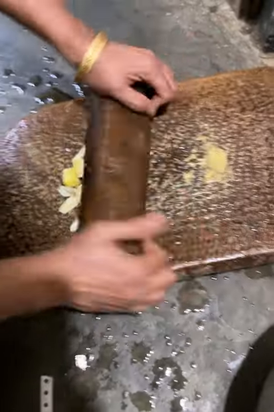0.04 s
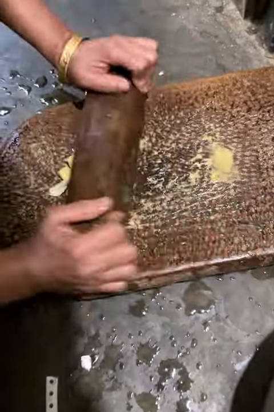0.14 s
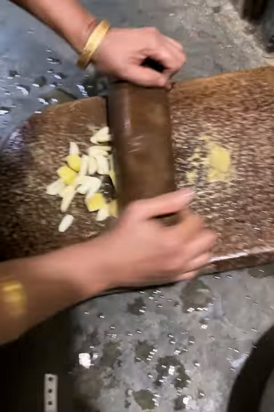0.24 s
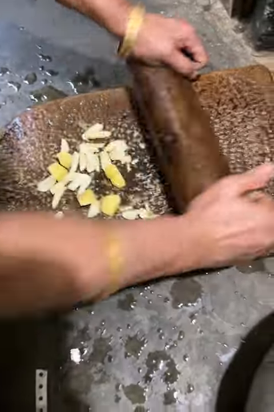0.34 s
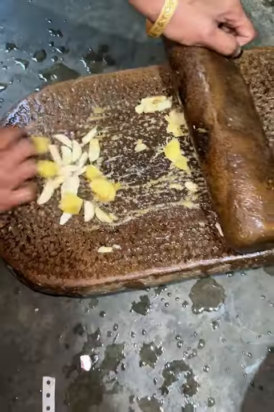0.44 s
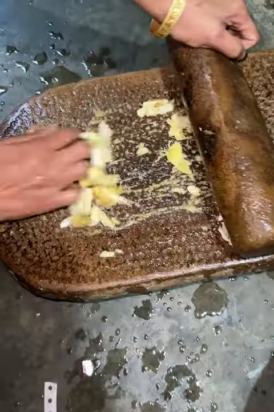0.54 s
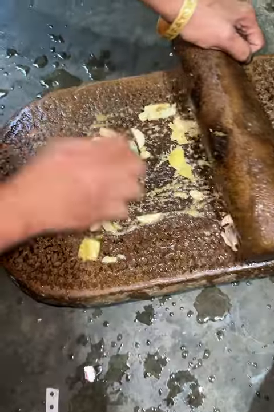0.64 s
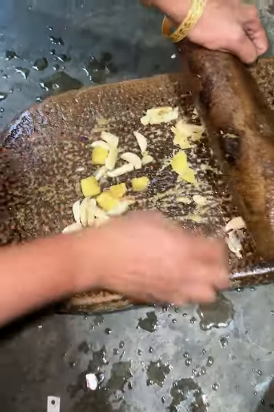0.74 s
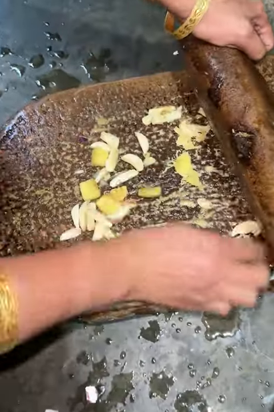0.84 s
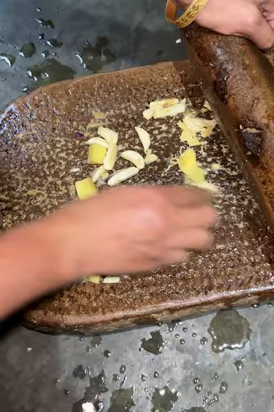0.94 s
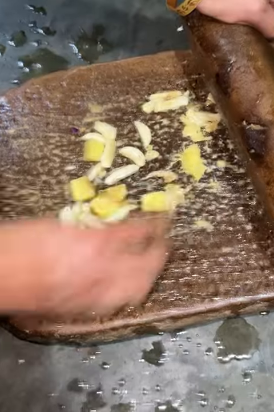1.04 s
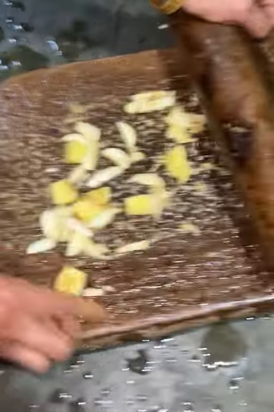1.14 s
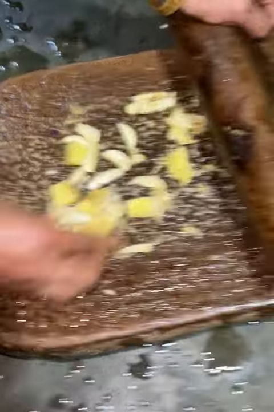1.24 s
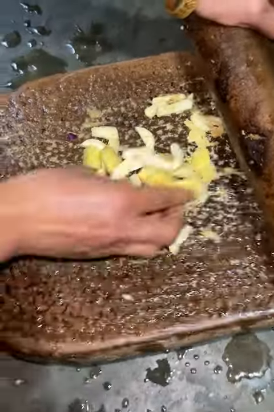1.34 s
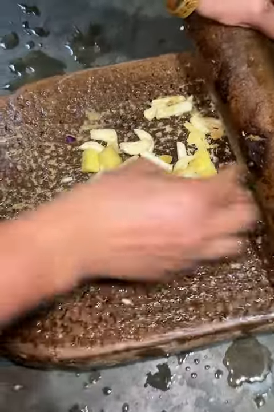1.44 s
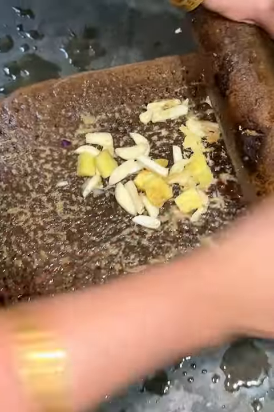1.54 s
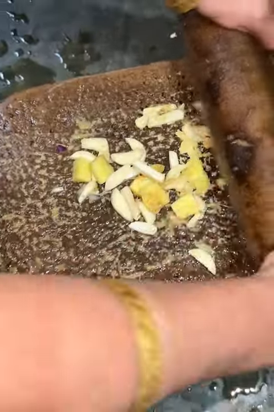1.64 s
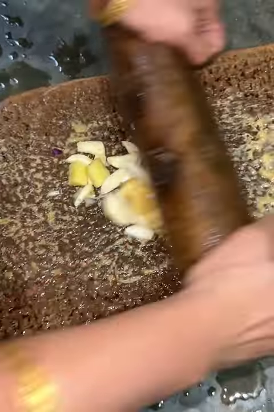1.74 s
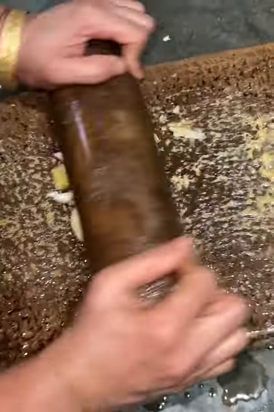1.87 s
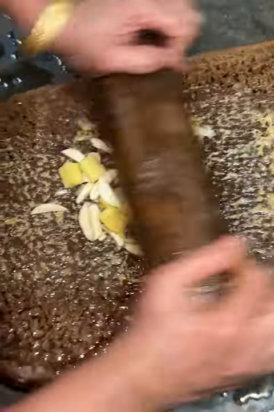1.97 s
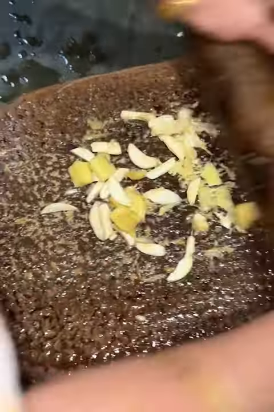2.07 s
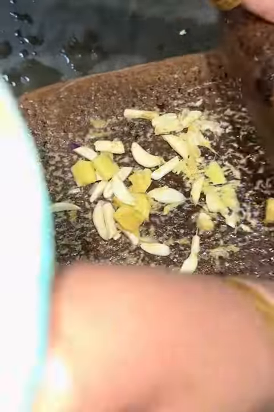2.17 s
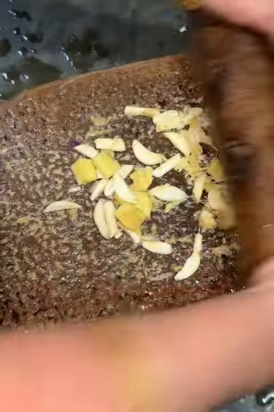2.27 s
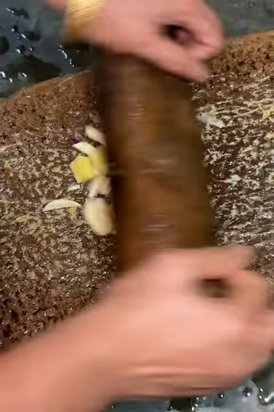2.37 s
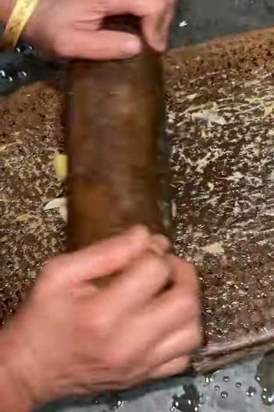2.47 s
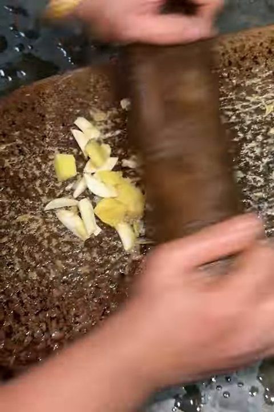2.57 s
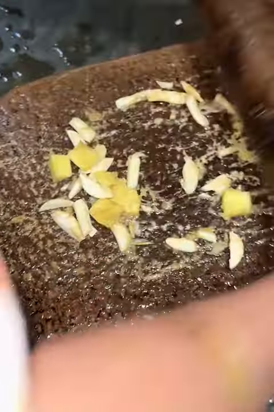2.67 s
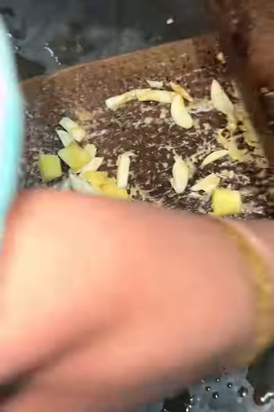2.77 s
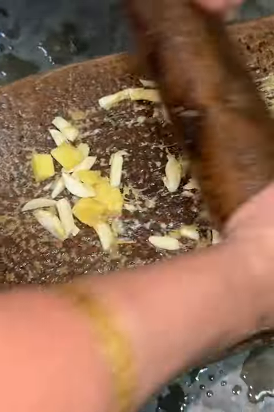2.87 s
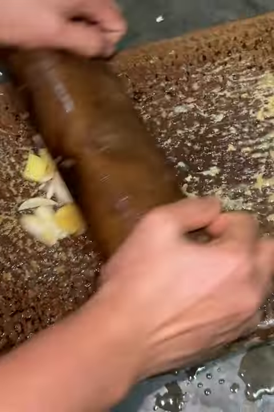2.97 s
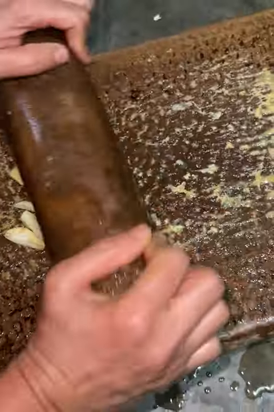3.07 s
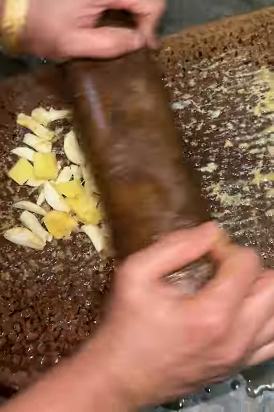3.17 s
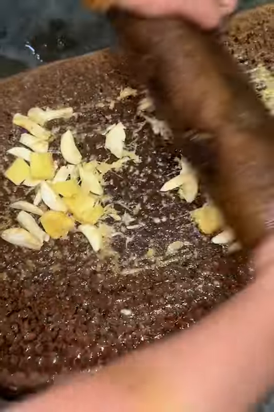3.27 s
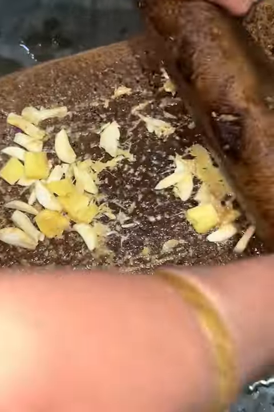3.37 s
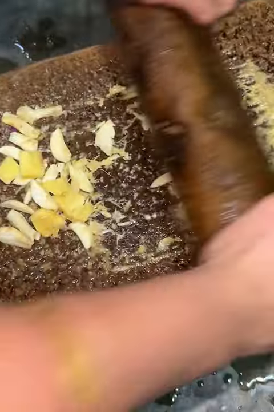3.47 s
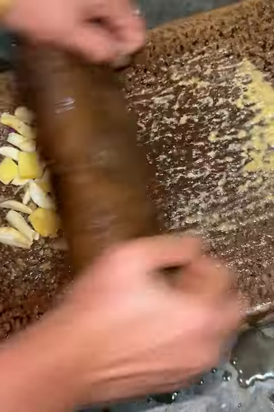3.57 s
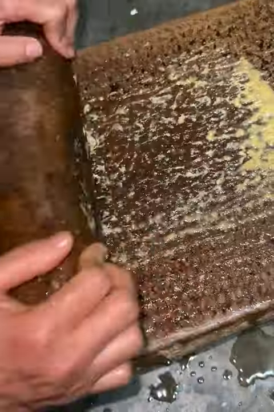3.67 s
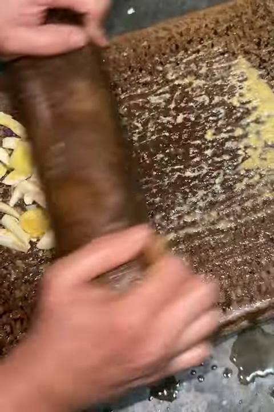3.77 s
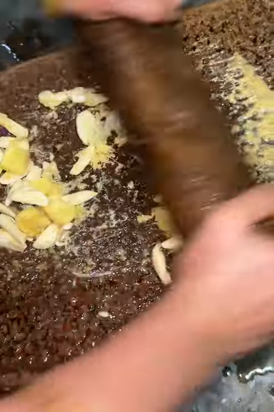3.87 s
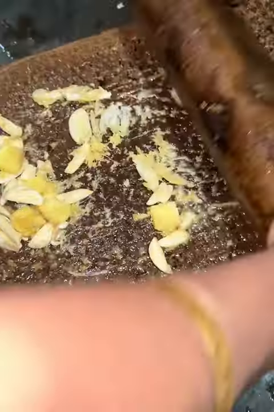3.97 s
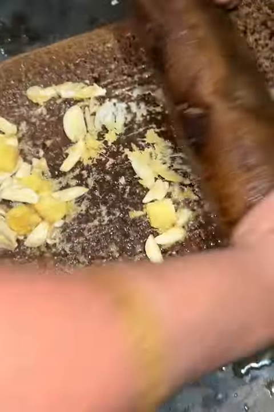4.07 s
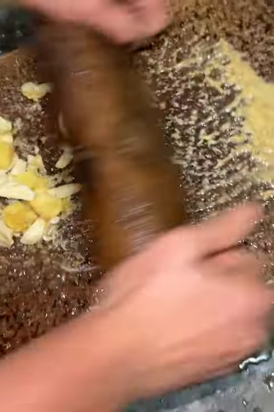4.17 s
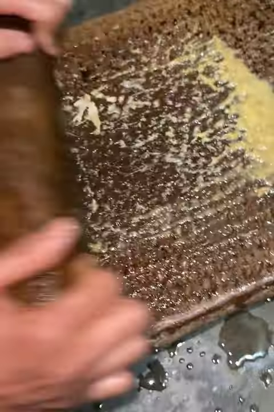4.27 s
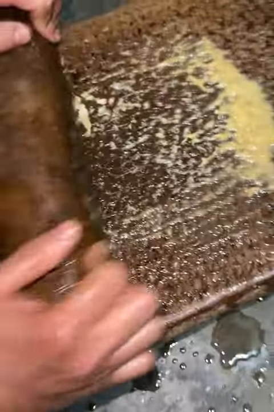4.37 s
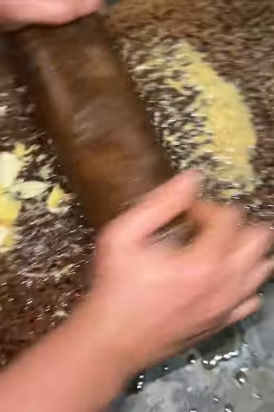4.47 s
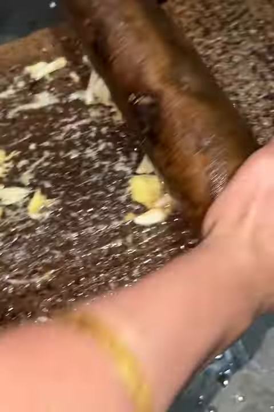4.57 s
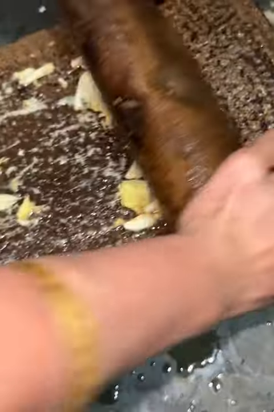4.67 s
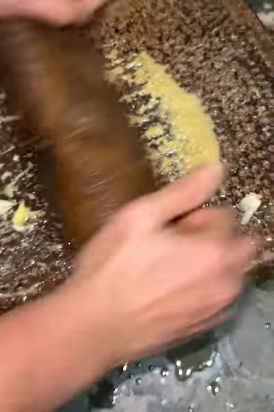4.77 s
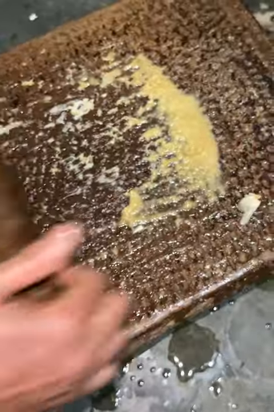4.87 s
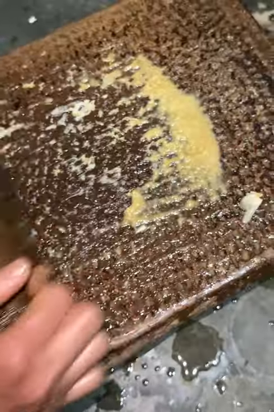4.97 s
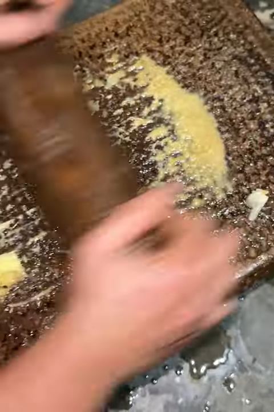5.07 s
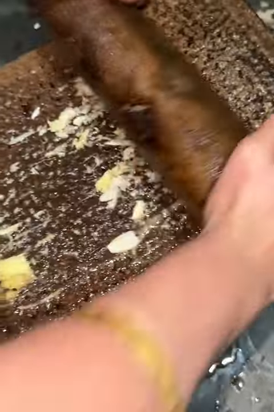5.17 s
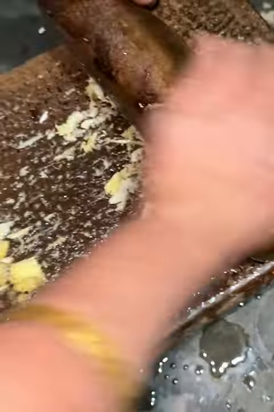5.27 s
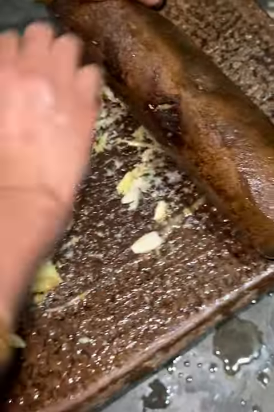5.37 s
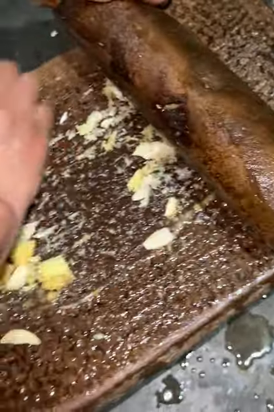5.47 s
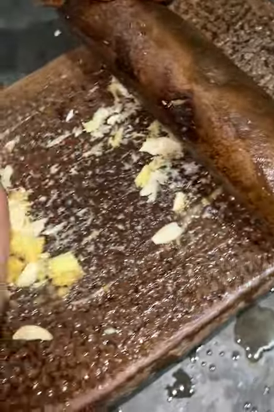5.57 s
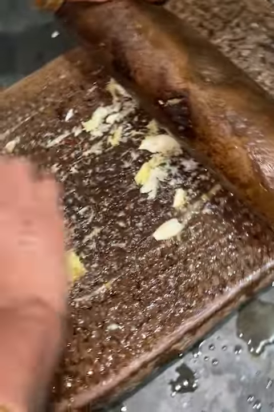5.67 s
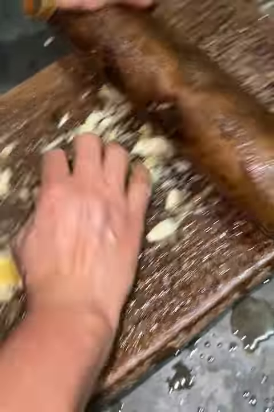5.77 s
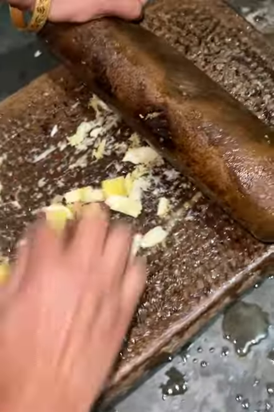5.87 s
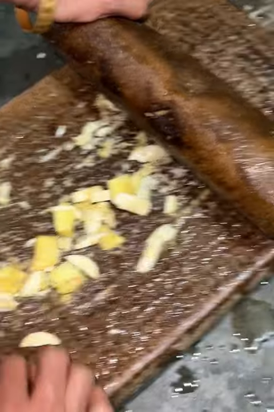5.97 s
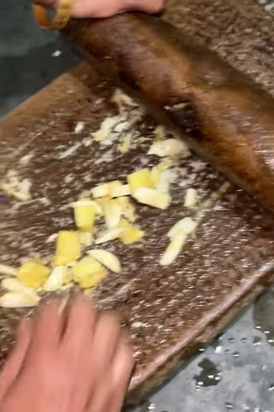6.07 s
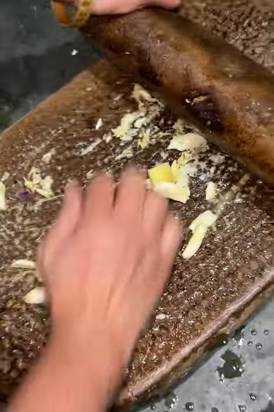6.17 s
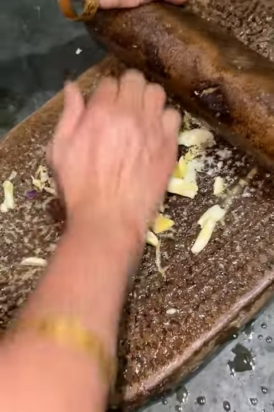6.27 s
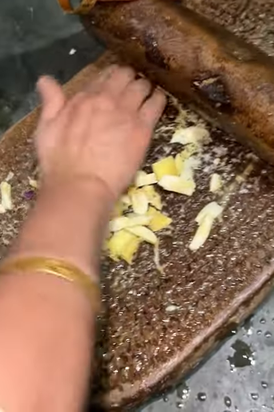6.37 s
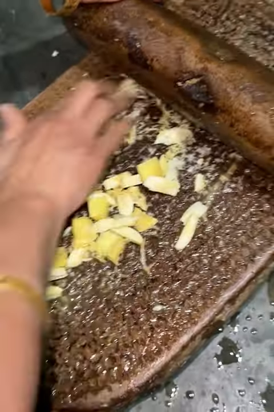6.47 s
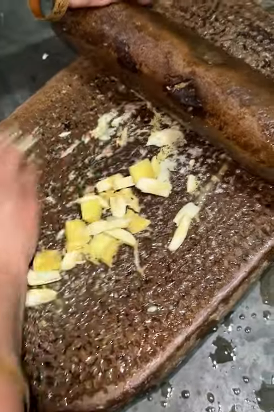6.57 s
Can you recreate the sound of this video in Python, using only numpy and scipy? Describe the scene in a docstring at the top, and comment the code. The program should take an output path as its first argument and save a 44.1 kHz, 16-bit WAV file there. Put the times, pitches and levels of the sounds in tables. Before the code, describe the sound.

A heavy stone roller knocks and scrapes across a pitted stone slab in quick gritty bursts, crushing wet food in a hard-walled kitchen.

```python
"""Stone knocks on stone: a roller strikes a pitted slab and is dragged over wet food, close to the microphone.
Each knock rings slab, roller and floor, and a hard kitchen echoes it; each stroke hisses, rumbles and drones.
A bangle clinks once as a set of beating metal modes; behind lie a faint trickle of filtered noise, room tone,
and gurgles and rustles made of clustered small tones. Early on the sound drops out once and fades back in."""
import sys
import numpy as np
from scipy import signal
from scipy.fft import rfft, irfft, next_fast_len
from scipy.io import wavfile
from scipy.ndimage import uniform_filter1d

SR = 44100
rng = np.random.default_rng(int(sys.argv[2]) if len(sys.argv) > 2 else 0)


def generate_wav(signal):
    """Clip the signal to [-1, 1] and save it as 16-bit WAV at the path in sys.argv[1]."""
    frames = np.transpose(np.atleast_2d(signal))
    scaled = np.clip(frames, -1, 1) * 32767
    pcm = np.round(scaled).astype(np.int16)
    wavfile.write(sys.argv[1], SR, pcm)


N = 291942

# Blows of the roller on the slab. Each row: start in seconds, slab level in dB, floor thump level in dB,
# roller level in dB, slab brightness in dB per octave.
BLOWS = [(0.096, -31, -27, -56, -11.5), (0.226, -7.5, -29.5, -14.5, 2.3), (0.253, -30, -37, -26, 7),
         (0.278, -20, -43, -25, 7), (0.309, -19, -35, -26, 0), (0.344, -28.5, -44, -47, -4),
         (0.939, -39, -31.5, -42, -3), (1.628, -21, -27, -36, -10), (1.653, -13.5, -40, -23.5, 5),
         (1.7, -21.5, -27, -29, -5), (1.736, -13.5, -28, -18, -1), (1.757, -31, -29, -21.5, 3),
         (1.854, -29.5, -50, -31, -1), (2.017, -5, -18, 0.5, -0.5), (2.045, -1.5, -13.5, -36, 2.5),
         (2.252, -19, -26.5, -26.5, -3), (2.517, 3.5, -22, -20.5, 4), (2.531, -5.5, -36, -40, -2),
         (2.554, -9, -15.5, -23, 5), (2.649, -9, -30, 3.5, -0.5), (2.681, -2.5, -25, -36, 2),
         (2.708, -15, -17.5, -34, -1.5), (2.87, -20, -23, -42, -4.5), (2.885, -17.5, -26, -30, 10),
         (2.918, -6.5, -22.5, -19, 7.5), (2.94, -3, -42, -9, -0.5), (2.959, -15, -28, -18, 6),
         (2.972, -12.5, -35, -28, 0.1), (3.032, -9, -43, -14.5, 7), (3.055, -16.5, -43.5, -40, -1),
         (3.113, -3, -15.5, -29.5, -1), (3.238, -1.5, -33, -12, 8.5), (3.259, -18, -38, -35, -3),
         (3.276, 0, -44, -4.5, 2.5), (3.299, -33, -20, -31, -4), (3.46, -23, -45, -22, -3),
         (3.731, 3.5, -12, -29, 3), (3.756, -12, -32, -22, 6), (3.859, 1, -24.5, -3.5, 7),
         (3.889, -12, -28.5, -17, 9), (4.186, -15.5, -31, -14.5, 1.5), (4.209, -17.5, -56, -15, 2),
         (4.353, 3, -12, -24, 3), (4.376, -8.5, -22, -21, 2.5), (4.544, -8, -36, 2, -2),
         (4.556, -8, -24, -35, 1.5), (4.583, -12, -23.5, -32, 0.1), (4.982, -14, -27, -49, -8),
         (5.009, -45, -25.5, -51, -2), (5.16, -21.5, -30.5, -32, -4.5), (5.21, -29.5, -49, -57, 2)]
# Modes of the floor, the stone slab and the stone roller.
# Each row: frequency in Hz, level in dB, time to fall 60 dB in seconds.
FLOOR_MODES = [(101.9, -3.5, 0.26), (120.5, 2, 0.27)]
SLAB_MODES = [(240, -8, 0.099), (276.7, -8, 0.13), (343.2, -1.5, 0.058), (505.8, 2, 0.06),
              (596.4, -3.5, 0.069), (645, -1.5, 0.061), (697.6, -4.5, 0.052), (863, -4.5, 0.024)]
ROLLER_MODES = [(1080, -8, .018), (1410, 3, .028), (1700, -3, .017), (2140, -3, .013), (2700, -9, .009),
                (3600, -18, .006)]
# The one dropout: start in seconds, fade-in in seconds.
DROPOUT = (.3945, .035)


def amp(db):
    """Amplitude of a level in dB."""
    return 10 ** (np.asarray(db) / 20)


def unit(x):
    """x scaled to an RMS of 1."""
    return x / np.sqrt(np.mean(x ** 2) + 1e-20)


def along(points, hz):
    """Curve through (Hz, value) points, straight on a log frequency axis."""
    f, v = np.transpose(points)
    return np.interp(np.log(hz + 1), np.log(f + 1), v)


def filtered(x, response):
    """x passed through a complex response of frequency."""
    m = next_fast_len(N + SR // 2)
    return irfft(rfft(x, m) * response(np.fft.rfftfreq(m, 1 / SR)), m)[..., :N]


def patchy(patchy_db, wide, long):
    """Two unrelated white noises sharing patches of random gain, wide in bins and long in frames."""
    z = signal.stft(rng.standard_normal((2, N)), nperseg=256)[2]
    field = uniform_filter1d(rng.standard_normal(z.shape[1:]), wide, 0)
    field = uniform_filter1d(field, long, 1)
    return signal.istft(z * amp(patchy_db * unit(field)), nperseg=256)[1][:, :N]


def resonant(modes, blur):
    """Response of a body as a sum of resonances of alternating sign; blur widens them."""
    def response(f):
        total = 0
        for k, (hz, db, t60) in enumerate(modes):
            width = blur * np.log(1000) / (np.pi * t60)
            total = total + (-1) ** k * amp(db) * 1j * f * width / (hz * hz - f * f + 1j * f * width)
        return total
    return response


def struck(modes, t, cycles, tilt_db):
    """One blow, peak 1: each mode swells over a few of its own cycles, so the low ones arrive last.
    tilt_db (per octave) dulls a soft contact; neighbouring high modes start in opposite directions."""
    ring = 0
    for k, (hz, db, t60) in enumerate(modes):
        size, detune = rng.standard_normal(2)
        sign = np.cos(np.pi * k * (hz > 1e3))
        level = amp(db + tilt_db * np.log2(hz / 1e3) + 2.2 * size - 60 * t / t60)
        swell = (1 - np.exp(-t * hz / cycles)) ** 2
        ring = ring + sign * level * swell * np.sin(2 * np.pi * hz * (1 + .015 * detune) * t)
    return ring / np.abs(ring).max()


def kitchen_echo(x):
    """Reverberation through a fresh pair of noise tails; each frequency dies at its own speed."""
    # Each row: frequency in Hz, time to fall 60 dB in seconds.
    echo_decay = [(150, 0.8), (500, 0.23), (1500, 0.28), (4000, 0.16)]
    hz, t, z = signal.stft(rng.standard_normal((2, SR // 2)), SR, nperseg=256)
    fade = amp(-60 * t / along(echo_decay, hz)[:, None])
    tail = signal.istft(z * fade, SR, nperseg=256)[1]
    delayed = np.pad(x, (500, 0))[None]  # samples of silence before the echo
    return signal.fftconvolve(delayed, tail / np.linalg.norm(tail[0]), axes=1)


def knocks():
    """Slab, roller and floor ring together with a noisy crack; the hard walls answer each blow."""
    out, t = np.zeros((2, N + 2 * SR)), np.arange(SR // 2) / SR
    brief = t[:SR // 8]
    last = 0
    for s, slab_db, thump_db, roller_db, bright_db in BLOWS:
        soft = np.clip((slab_db - roller_db) / 20, 0, 1)  # food under the roller cushions the contact
        slab = amp(slab_db) * struck(SLAB_MODES, brief, cycles=0.64, tilt_db=bright_db)
        roller = amp(roller_db) * struck(ROLLER_MODES, brief, cycles=.5, tilt_db=2 - 9 * soft)
        thump = amp(thump_db) * struck(FLOOR_MODES, t, cycles=1.0, tilt_db=-9)
        crack = amp(roller_db - 14.5 - 60 * brief / .006) * rng.standard_normal(len(brief))
        echo = kitchen_echo(amp(-7.5) * slab + amp(-17.5) * roller)
        if s > DROPOUT[0] > last:
            out[:, round(DROPOUT[0] * SR):] = 0  # tails of the earlier blows end at the dropout
        last = s
        at = round(s * SR)
        out[0, at:at + len(t)] += thump
        out[0, at:at + len(brief)] += slab + roller + crack
        out[:, at:at + echo.shape[1]] += echo
    return out[:, :N]


def rattle():
    """Chatter of the roller that dies away after each blow, in proportion to the roller's level."""
    under_blow_db, decay_db_per_s = -25.5, 142
    blows = np.zeros(N)
    for s, slab_db, thump_db, roller_db, bright_db in BLOWS:
        blows[round(s * SR)] = amp(roller_db + under_blow_db)
    decay = amp(-decay_db_per_s * np.arange(SR // 2) / SR)
    return signal.fftconvolve(blows, decay)[:N].clip(0)


def pressure(release_db_per_s, order):
    """Rise, hold and release of every stroke, summed in power with the fingers' level.
    order picks the level: 0 hiss, 1 rumble, 2 drone."""
    # Strokes of the roller. Each row: moment of full pressure in seconds, rise in seconds, hold in seconds,
    # grit hiss level in dB, slab rumble level in dB, floor drone level in dB.
    roller_strokes = [(0.0, .01, .14, -42.5, -50, -40), (0.229, 0.099, 0.025, -30, -42, -48),
                      (1.255, 0.068, 0.009, -44, -58, -60), (1.675, 0.018, .005, -37, -46, -42),
                      (1.753, 0.059, 0.023, -33.5, -65, -51), (1.882, .04, 0.0106, -41, -72, -51),
                      (2.015, 0.098, 0.027, -22, -56, -36), (2.333, 0.11, 0.1, -34, -52.5, -40),
                      (2.506, 0.035, 0.15, -32, -40, -41), (2.912, 0.13, 0.057, -34.5, -31, -29),
                      (3.108, 0.073, 0.13, -30, -50, -35), (3.495, 0.055, 0.2, -38, -65.5, -45.5),
                      (3.729, .03, 0.15, -30.5, -33, -40), (3.996, 0.011, .005, -35, -41, -51),
                      (4.186, 0.12, 0.042, -32.5, -45, -39), (4.304, 0.014, .005, -38, -66, -47),
                      (4.351, 0.03, 0.17, -29.5, -38, -28), (4.775, 0.073, 0.12, -34.5, -55, -36.5),
                      (4.99, 0.048, .15, -31.5, -49, -32), (5.343, 0.018, .005, -45.5, -69, -55)]
    # Fingers gathering the food between strokes. Each row: time in seconds, grit hiss level in dB,
    # slab rumble level in dB, floor drone level in dB.
    fingers = [(0, -46, -59, -46), (.5, -44.5, -52.5, -54), (1, -46.5, -52.5, -46),
               (1.6, -44.5, -55, -49.5), (2.2, -51.5, -49.5, -41.5), (3.4, -45.5, -46.5, -48.5),
               (4.7, -49, -52, -45), (5.4, -54, -51.5, -60.5), (5.9, -56, -60.5, -54.5),
               (6.07, -45.5, -50.5, -50), (6.25, -52.5, -55, -52), (6.62, -45, -57, -54)]
    rise_db, sag_db_per_s = 21, 14  # climb during the rise, slackening in the hold
    t = np.arange(0, N + 32, 32) / SR
    power = amp(np.interp(t, *np.transpose(fingers)[[0, 1 + order]])) ** 2
    for s, rise, hold, *levels in roller_strokes:
        since = t - s
        climb = rise_db * np.minimum(since, 0) / (rise + 1 / SR)
        sag = sag_db_per_s * np.clip(since, 0, hold)
        release = release_db_per_s * np.maximum(since - hold, 0)
        power += amp(levels[order] + climb - sag - release) ** 2
    return np.interp(np.arange(N) / SR, t, np.sqrt(power))


def strokes():
    """Grit on the pitted face: dense grains hiss, coarser bumps shake slab and floor, chatter grates."""
    # Spectrum of the grit. Each row: frequency in Hz, relative level in dB per Hz.
    grit = [(700, -4), (1600, -4), (3000, 1), (5500, 0.5), (7900, 2.5), (9500, -1), (10800, 0.5),
            (12500, -5), (15900, -5)]
    hiss_release, heavy_release = 217, 102  # dB per s; rumble and drone die more slowly than the hiss
    impacts = (rng.random(N) < .008) * rng.exponential(9.5, N)
    grains = 1 + 0.61 * uniform_filter1d(impacts, size=24)
    hiss = unit(filtered(grains * patchy(2.84, wide=6, long=5), lambda hz: amp(along(grit, hz))))
    rumble = unit(filtered(rng.standard_normal((2, N)), resonant(SLAB_MODES, blur=1.4)))
    drone = unit(filtered(rng.standard_normal((2, N)), resonant(FLOOR_MODES, blur=2.85)))
    crunch = unit(filtered(grains * rng.standard_normal((2, N)), resonant(ROLLER_MODES, blur=3.4)))
    chatter = rattle()
    out = amp(0.4) * chatter ** 1.19 * crunch  # the chatter also grates in the roller, fading faster there
    out += pressure(hiss_release, order=0) * hiss
    out += (pressure(heavy_release, order=1) + chatter) * rumble
    out += pressure(heavy_release, order=2) * drone
    return out


def bangle():
    """A thin metal ring taps the stone; its modes come in close pairs that beat, with a noisy tick."""
    # Modes of the ring. Each row: frequency in Hz, level in dB, time to fall 60 dB in seconds.
    ring_modes = [(3273, -24, .26), (4759, -17, .17), (6767, -14, .13), (8597, -4, .15), (9017, -18, .1),
                  (10920, 1, .16), (13500, -2, .12)]
    # The one clink: start in seconds, level in dB.
    clink = (2.1135, -13.5)
    out, t = np.zeros((2, N)), np.arange(SR // 2) / SR
    s, db = clink
    splits = rng.uniform(0.0025, 0.0058, len(ring_modes))
    ring = 0
    for (hz, level, t60), split in zip(ring_modes, splits):
        pair = np.sin(2 * np.pi * hz * t) + 0.43 * np.sin(2 * np.pi * hz * (1 + split) * t)
        ring = ring + amp(level - 60 * t / t60) * pair
    tick = 2.0 * amp(-60 * t / 0.013) * np.diff(rng.standard_normal((2, len(t) + 1)))
    out[:, round(s * SR):][:, :len(t)] = amp(db) * (ring * [[1], [.3]] + tick)
    return out


def water_and_rustles():
    """A patchy distant trickle over the room tone, with short gurgles and rustles,
    each a cluster of small decaying tones around one pitch."""
    # Spectrum of trickle and room tone. Each row: frequency in Hz, relative level in dB per Hz.
    kitchen = [(25, -12), (36, -9), (50, 16.5), (120, 4), (300, 2.5), (600, -10), (1200, -5), (2200, -6.5),
               (3200, -5), (5000, -9), (8000, -7.5), (12000, -14.5), (16000, -16)]
    # Short gurgles and rustles. Each row: start in seconds, pitch in Hz, length in seconds,
    # pitch spread (0-1, roughly), level in dB.
    clusters = [(0.174, 3060, 0.045, 0.53, -37), (.36, 3900, 0.038, 0.2, -46),
                (0.427, 2790, 0.11, 0.99, -35), (0.488, 3960, 0.026, 0.09, -38),
                (0.593, 2880, 0.06, 0.76, -37), (0.667, 1530, 0.025, 0.12, -45.5),
                (0.713, 1255, 0.071, .15, -46), (0.754, 2520, 0.092, 0.5, -46),
                (1.066, 1537, 0.061, 0.09, -38), (1.175, 3500, 0.041, 0.04, -39),
                (1.256, 3970, 0.033, 0.2, -39.5), (1.597, 1505, 0.044, 0.34, -40),
                (3.6, 3470, .03, .15, -37), (3.833, 3780, 0.021, 0.11, -31.5),
                (3.89, 3530, 0.036, 0.03, -37.5), (4.142, 3630, 0.047, 0, -37.5),
                (4.901, 2590, 0.052, 0.65, -37), (5.337, 3900, 0.042, 0.3, -46),
                (5.66, 4000, 0.046, 0.1, -44), (5.748, 2980, 0.036, 0.65, -41.5),
                (5.852, 4550, 0.044, 0.56, -39.5), (5.983, 800, 0.074, 1.05, -40),
                (6.334, 3140, 0.1, 0.35, -35.5), (6.534, 3020, 0.057, 0.3, -45)]
    trickle = filtered(patchy(3.8, wide=5, long=14), lambda hz: amp(along(kitchen, hz)))
    out = np.pad(amp(-44.5) * unit(trickle), ((0, 0), (0, SR)))
    t = np.arange(SR // 40) / SR
    for s, hz, length, spread, db in clusters:
        for when, pitch, size in rng.random((40, 3, 2)).mean(2):  # 40 tones, mostly near the middle
            tone = np.sin(2 * np.pi * hz * np.exp(1.48 * spread * (pitch - .5)) * t)
            blip = tone * np.exp(-t * hz / 9) * (1 - np.exp(-t / 0.00024))
            at = round((s + (1.5 * when - .25) * length) * SR)
            out[0, at:][:len(t)] += amp(db - 5.3 * size) * blip
    return out[:, :N]


def scene():
    """Row 0 of each source reaches left and right alike, row 1 is what differs between them."""
    # Likeness of left and right, set by band. Each row: frequency in Hz, likeness (1 is identical).
    alike = [(120, 1), (350, .9), (700, .66), (1050, .5), (1500, .82), (1900, 1), (5000, 1), (5900, .86),
             (10300, .83), (11300, 1), (13200, 1), (14100, .78)]
    # Phase of left against right, set by band. Each row: frequency in Hz, phase in radians.
    phase = [(100, 0), (900, .25), (1900, 0), (5100, 0), (5900, -.6), (7900, -1.6), (10500, -2.7),
             (11200, -np.pi), (13400, -np.pi), (14100, -3.8), (15700, -4.5)]
    # Each row: frequency in Hz, left minus right level in dB.
    left = [(110, 0), (200, .4), (700, 1.5), (2400, 0)]

    def shares(hz):
        turn = np.arccos(np.clip(along(alike, hz), -1, 1)) / 2
        return np.array([np.cos(turn), np.sin(turn)])

    def sides(hz):
        half = amp(along(left, hz) / 2) * np.exp(.5j * along(phase, hz))  # half the difference to each side
        return np.array([half, 1 / half])

    same, other = filtered(knocks() + strokes() + bangle() + water_and_rustles(), shares)
    return filtered(np.array([same + other, same - other]), sides)


def record(dry):
    """A brief dropout, clipping of the loudest blows, then the band limit and full scale."""
    top_hz = 15950
    s, fade = DROPOUT
    since = np.arange(N) / SR - s
    x = dry * np.where(since < 0, 1, np.clip(since / fade, .04, 1))
    x = x / (1 + np.abs(x) ** 24) ** (1 / 24)  # nearly hard clipping
    return np.clip(filtered(x, lambda hz: hz < top_hz), -1, 1)


dry = scene()
out = record(dry)
generate_wav(out)
```